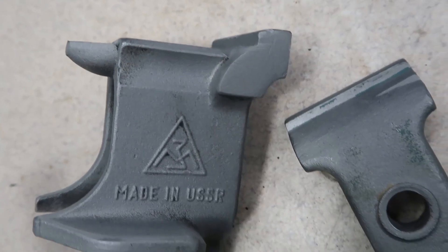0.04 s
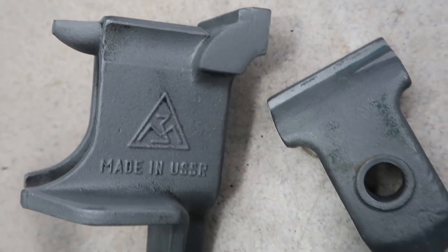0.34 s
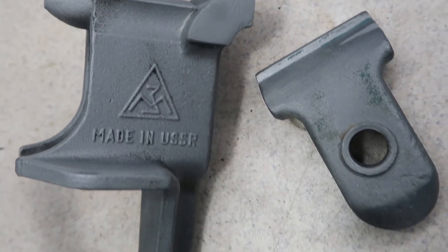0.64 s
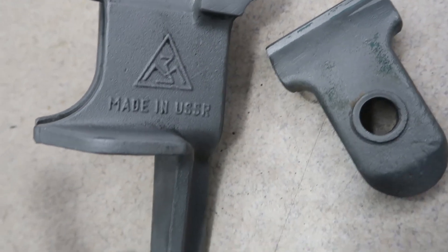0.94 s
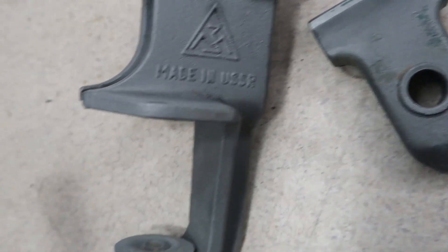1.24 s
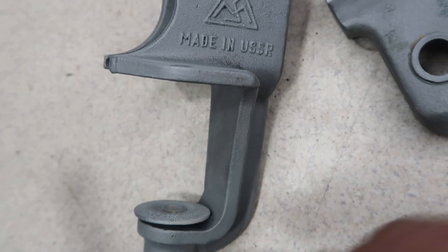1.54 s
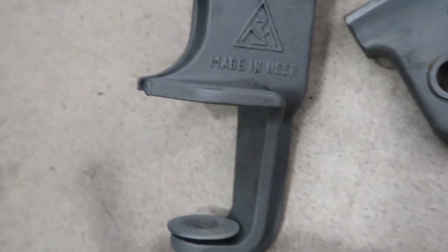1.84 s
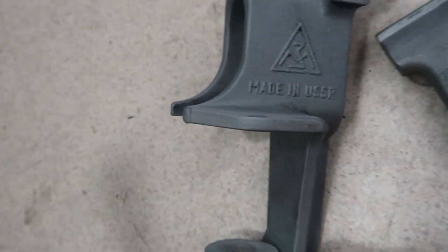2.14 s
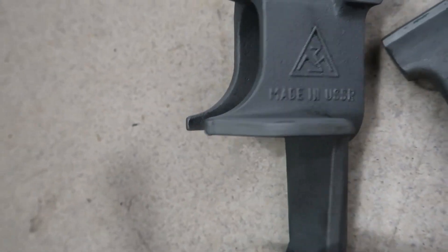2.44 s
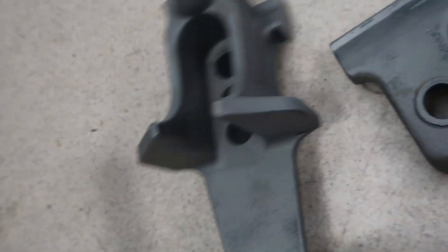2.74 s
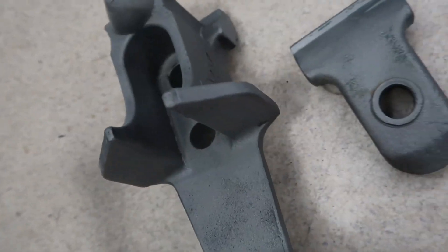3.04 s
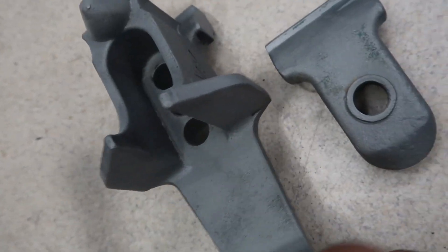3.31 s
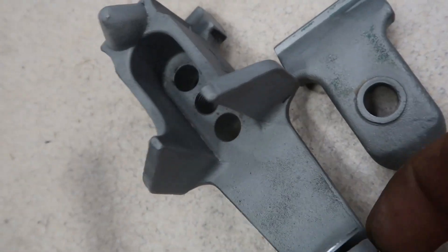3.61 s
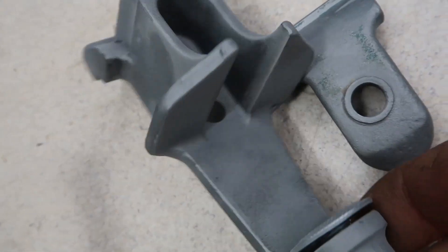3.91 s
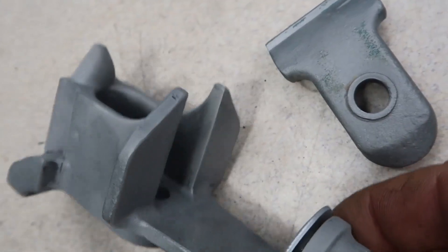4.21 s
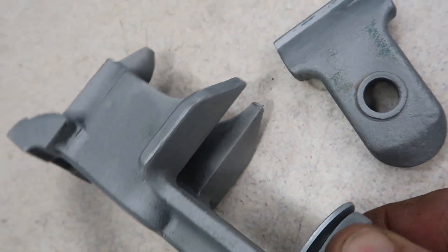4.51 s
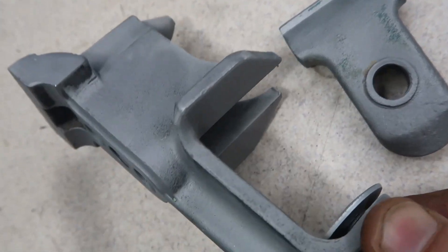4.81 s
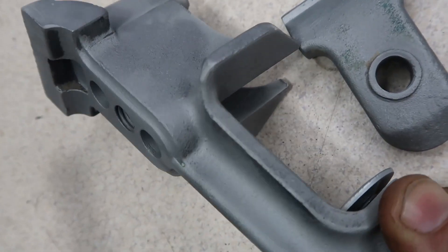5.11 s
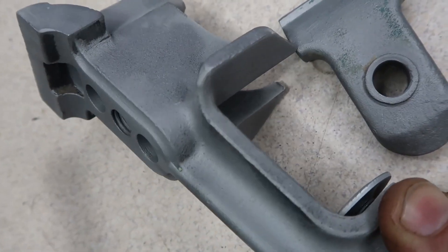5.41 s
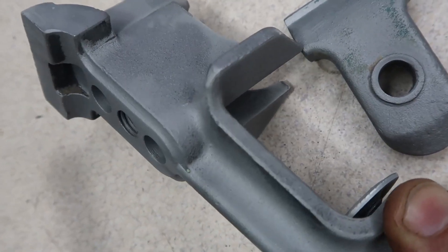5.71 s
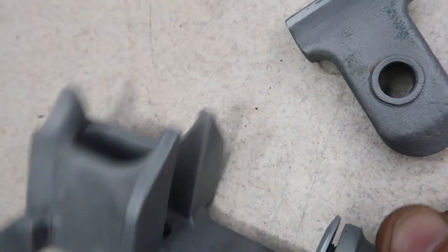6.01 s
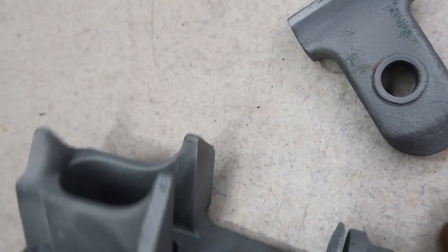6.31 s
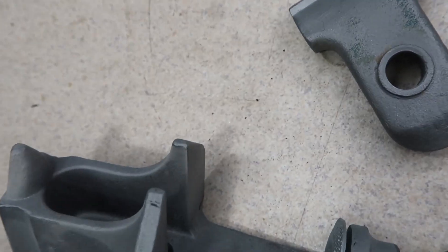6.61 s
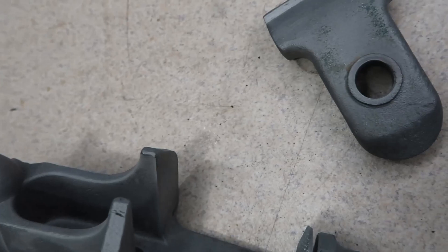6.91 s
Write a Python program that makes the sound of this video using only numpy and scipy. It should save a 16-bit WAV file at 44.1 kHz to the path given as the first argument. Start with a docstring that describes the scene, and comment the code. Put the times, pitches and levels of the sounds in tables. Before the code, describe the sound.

Faint room air and a low machine drone fill a bare workshop, with a barely audible finger rub just after 1 second. From 2 seconds, small ticks and brief rasps come from a cast-iron vise body being handled close to the microphone. At about 2.7 seconds it drags across the hard bench in a short, juddering scrape with a knock. It rocks softly with dull bumps, rubbing and clicks of grit until a second, grinding drag runs from 4 seconds and ends in a sharp knock at 4.4. Another knock comes at 5.2 seconds. After a few light ticks, the iron is set down at about 6.1 seconds with a quick cluster of loud knocks and a short metallic ring, then one last knock at 6.5. The hardest hits slightly overload the microphone and die away quickly in the room.

```python
"""Faint finger rubs on paint, then judders and knocks: a cast-iron vise body turned over on a bench.
The casting rocks under the hand, is dragged twice in stick-slip, tips and is set down with a few knocks.
Contact forces ring the modes of the hard bench top, the iron and a bare workshop; grit and nails tick.
Room air and a low machine drone lie beneath. The hardest knocks overload the close microphone:
their crests flatten, the gain ducks and slowly recovers."""
import sys
import numpy as np
from scipy import signal
from scipy.fft import rfft, irfft, next_fast_len
from scipy.io import wavfile
from scipy.ndimage import uniform_filter1d, minimum_filter1d, map_coordinates

SR = 44100
rng = np.random.default_rng(int(sys.argv[2]) if len(sys.argv) > 2 else 0)


def unload_wav(signal):
    """Save mono or channel-first audio to the path in sys.argv[1] as 16-bit WAV at rate SR, clipped to [-1, 1]."""
    wavfile.write(
        sys.argv[1],
        SR,
        np.round(np.clip(np.atleast_2d(signal).T, -1, 1) * 32767).astype(np.int16),
    )


N = 306481
TIME = np.arange(N) / SR


def from_db(db):
    """Decibels to gain."""
    return 10 ** (np.asarray(db) / 20)


def unit_rms(x):
    """Scale to rms 1."""
    return x / np.sqrt(np.mean(x ** 2) + 1e-20)


def at_hz(points, hz):
    """Interpolate (Hz, value) rows over log frequency."""
    points = np.array(points)
    return np.interp(np.log(hz + 1e-9), np.log(points[:, 0]), points[:, 1])


def cut(x, hz, kind, order=2):
    """Butterworth filter."""
    sos = signal.butter(order, np.clip(hz, 10, SR * 9 / 20), kind, fs=SR, output="sos")
    return signal.sosfilt(sos, x + 1e-18)


def drift(rate_hz):
    """Low-passed noise, rms 1."""
    return unit_rms(cut(rng.standard_normal(N), rate_hz, "low"))


def stereo_noise(correlation, size=N):
    """Two correlated white noises."""
    mid, side = rng.standard_normal((2, size))
    alike = np.clip(correlation, 0, 1)
    return np.sqrt((1 + alike) / 2) * mid + np.sqrt((1 - alike) / 2) * side * [[1], [-1]]


def colour(x, spectrum):
    """Shape noise by (Hz, dB) rows; rms 1."""
    size = next_fast_len(N)
    gain = from_db(at_hz(spectrum, np.fft.rfftfreq(size, 1 / SR)))
    return unit_rms(irfft(rfft(x, size) * gain, size)[..., :N])


def grains(per_s, spread_db):
    """Random clicks of uneven size, rms 1."""
    sizes = from_db(spread_db * np.minimum(rng.exponential(1, N), 4)) * rng.choice([-1, 1], N)
    return unit_rms(sizes * (rng.random(N) < per_s / SR))


def ringing(modes):
    """Impulse response of damped modes, 1 s."""
    t = TIME[:SR]
    return sum(from_db(db - 60 * t / t60_s) * np.sin(2 * np.pi * hz * t) for hz, db, t60_s in modes)


def through(x, response):
    """Convolve with an impulse response."""
    return signal.fftconvolve(np.atleast_2d(x), np.atleast_2d(response), axes=1)[:, :N]


def swell(start_s, end_s, rise_db_per_s, fall_db_per_s):
    """Gain that reaches 1 at the start, holds, and fades after the end."""
    under_db = rise_db_per_s * np.maximum(start_s - TIME, 0) + fall_db_per_s * np.maximum(TIME - end_s, 0)
    return from_db(-np.minimum(under_db, 200))


def bell(centre_s, width_s):
    """Gaussian envelope."""
    return np.exp(-np.minimum(((TIME - centre_s) / width_s) ** 2, 50))


def background(air_db, hiss_db):
    """Room air, correlated only in the bass; microphone hiss, machine drone, thin electronic whine."""
    # Each row: frequency in Hz, relative density in dB.
    air_spectrum = [(15, -37), (25, -9.5), (59, -4), (82, -11.5), (101, -9.5), (209, -18.5), (227, -16),
                    (281, -16), (433, -17), (537, -22.5), (648, -21.5), (1530, -25.5), (11800, -45.5),
                    (12800, -49), (15500, -76.5)]
    # Each row: frequency in Hz, width in Hz, rms level in dB.
    drone = [(53.8, 7, -63.5)]
    whine = [(13006, 10, -91)]
    diffuse = cut(stereo_noise(0), 220, "high") + cut(rng.standard_normal(N), 260, "low")
    air = from_db(air_db) * colour(diffuse, air_spectrum)
    hiss = from_db(hiss_db) * cut(stereo_noise(0), 2500, "high", order=1)
    tones = 0
    for hz, width_hz, db in drone + whine:
        cycles = np.cumsum(hz + width_hz / 2 * drift(width_hz)) / SR
        tones += from_db(db) * np.sqrt(2) * np.sin(2 * np.pi * cycles)
    return air + cut(hiss, 3500, "low") + tones


def hand():
    """The hand slides and pushes: envelopes of skin hiss, singing and shuffle."""
    # Each row: start in s, end in s, then relative levels in dB of hiss, singing and shuffle.
    strokes = [(1.113, 1.303, -75, -97, -76), (2.242, 2.277, -60, -75, -62),
               (2.467, 2.474, -49.5, -56, -40), (2.558, 2.586, -57, -80, -69),
               (2.751, 2.888, -57, -54.5, -57), (2.96, 3.217, -71.5, -68.5, -54.5),
               (3.267, 3.603, -63, -62, -51.5), (3.678, 3.805, -61.5, -68, -56.5),
               (3.854, 3.926, -60, -83, -48.5), (4.005, 4.324, -61, -62.5, -57.5),
               (5.813, 6.024, -63, -90, -66.5), (6.12, 6.125, -50.5, -88, -38),
               (6.464, 6.473, -46.5, -78, -68), (6.551, 6.596, -57.5, -94, -74)]
    power = 0
    for start_s, end_s, *levels_db in strokes:
        envelope = swell(start_s, end_s, rise_db_per_s=166, fall_db_per_s=169.5)
        power += np.outer(from_db(levels_db), envelope) ** 2
    return np.sqrt(power)


def singing_iron(tipped_s, flicker_db, stray_share):
    """Friction stirs high modes; each flickers, and the pitch strays as the contact point moves."""
    # Modes before and after tipping. Each row: frequency in Hz, relative level in dB, t60 in s.
    upright = [(3796, 0.5, 0.049), (5740, -15, 0.0055), (7850, -3, 0.018), (8670, 10, 0.0047),
               (9050, -4, 0.014), (11000, 6.5, 0.0037)]
    lying = [(3440, 4, 0.015), (8800, -1.5, 0.009), (10500, -9.5, 0.08)]
    singing = 0
    for modes, in_pose in (upright, TIME < tipped_s), (lying, TIME >= tipped_s):
        stirred = 0
        for mode in modes:
            ring = through(stereo_noise(0.52), ringing([mode])[:SR // 4])
            stirred += ring * from_db(flicker_db * drift(12))
        singing += unit_rms(stirred) * in_pose
    stray = stray_share * drift(11)
    position = np.arange(N) + np.cumsum(stray - stray.mean())
    return np.array([map_coordinates(channel, [position], order=3, mode="mirror") for channel in singing])


def rubbing(slide, sing, skin_db, ring_db, rasp_db, flutter_db):
    """Skin hisses over paint, the iron sings with it, and an edge rasps on the first tilt."""
    # Each row: frequency in Hz, relative density in dB.
    skin_spectrum = [(800, -1.5), (1800, 6.5), (3000, 5.5), (3800, 5.5), (4600, 3), (6500, -1),
                     (8700, -3.5), (11000, -4), (13000, -10), (15500, -32.5)]
    edge_spectrum = [(900, -6.5), (1600, 7.5), (2500, -2.5), (3000, 8), (3300, -18), (3700, 4), (4700, -6),
                     (6000, -39), (10000, -8), (15000, -53)]
    # Each row: time in s, relative level in dB.
    rasps = [(2.257, -56), (2.43, -51.5), (2.48, -45.5)]
    skin = slide * colour(stereo_noise(0.9) + 0.47 * grains(5500, 2.3), skin_spectrum)
    singing = sing * singing_iron(tipped_s=3.9, flicker_db=4.0, stray_share=0.0051)
    tilt = sum(from_db(db) * swell(s, s, rise_db_per_s=502, fall_db_per_s=450) for s, db in rasps)
    rasp = tilt * colour(stereo_noise(0.93) + grains(2600, 4.5), edge_spectrum)
    flutter = from_db(flutter_db * drift(42))
    return (from_db(skin_db) * skin + from_db(rasp_db) * rasp) * flutter + from_db(ring_db) * singing


def shuffle(push, gain_db):
    """Dull force of the casting rocking lightly under the hand."""
    return from_db(gain_db) * push * cut(cut(grains(450, 3.6), 380, "low"), 120, "high")


def skids(edge_ratio):
    """A fingertip or an edge skids: a short chirr of narrow-band noise."""
    # Each row: centre time in s, half-width in s, level in dB, centre frequency in Hz.
    chirrs = [(1.145, 0.036, -77, 3670), (1.28, 0.037, -69, 1680), (2.015, 0.0078, -68, 1500),
              (2.268, 0.007, -53, 3160), (2.408, 0.021, -58, 3200), (2.48, 0.006, -41.5, 3650),
              (2.501, 0.007, -47, 3900), (2.795, 0.07, -49, 2200), (2.83, 0.06, -66, 13000),
              (3.272, 0.0072, -60, 7900), (3.336, 0.01, -54, 9100), (3.425, 0.015, -63, 9400),
              (3.433, 0.02, -62, 3800), (3.537, 0.029, -71, 3870), (3.568, 0.014, -61, 5200),
              (3.615, 0.0046, -52, 1880), (3.745, 0.003, -41, 3000), (3.783, 0.0026, -50, 4260),
              (4.23, 0.052, -55, 3340), (4.252, 0.035, -61.5, 4550), (5.934, 0.008, -63, 1690)]
    out, noise = np.zeros((2, N)), stereo_noise(0.87)
    for s, width_s, db, hz in chirrs:
        span = slice(max(round((s - .15) * SR), 0), round((s + .15) * SR))
        band = unit_rms(cut(noise[:, span], [hz / edge_ratio, hz * edge_ratio], "band"))
        out[:, span] += from_db(db) * band * bell(s, width_s)[span]
    return out


def knocks(knock_low_hz, bump_edge_ratio, bump_clank_db):
    """Forces on bench and iron: broad pulses as the casting drops, narrow-band bumps as it rocks."""
    # Each row: time in s, force in dB, centre frequency in Hz.
    bumps = [(2.017, -36, 238), (2.272, -34.5, 135), (2.422, -28.5, 230), (2.639, -42, 380),
             (2.666, -20.5, 304), (2.722, -11, 234), (3.267, -32, 420), (3.390, -33.5, 367),
             (3.434, -41.5, 400), (3.560, -36.5, 316), (3.61, -41.5, 305), (3.683, -35, 290),
             (3.849, -30, 316), (3.896, -28.5, 487), (3.938, -29.5, 340), (3.968, -26, 330),
             (3.987, -18.5, 260), (4.054, -19.5, 447)]
    # Each row: time in s, force in dB, contact cutoff in Hz, share sent to the iron in dB.
    drops = [(2.8496, -13, 2280, -14.5), (3.999, -25, 2090, -2), (4.4375, -6.5, 2330, -12.5),
             (5.197, -16, 2700, -19.5), (5.2051, -18.5, 175, -29), (5.2107, -13, 185, -35),
             (6.0742, 1, 2610, -23.5), (6.0946, -4, 2100, -0.5), (6.1152, -4.5, 1020, -22),
             (6.1198, -12, 1510, -10.5), (6.4700, -2.5, 1310, -18.5)]
    click = signal.unit_impulse(SR // 20)
    soft = [(s, db, cut(click, [hz / bump_edge_ratio, hz * bump_edge_ratio], "band"), bump_clank_db)
            for s, db, hz in bumps]
    hard = [(s, db, cut(cut(click, hz, "low"), knock_low_hz, "high"), clank_db)
            for s, db, hz, clank_db in drops]
    bench, iron = np.zeros((2, N))
    for s, force_db, pulse, clank_db in hard + soft:
        at = round(s * SR)
        bench[at:at + len(pulse)] += pulse * from_db(force_db)
        iron[at:at + len(pulse)] += pulse * from_db(force_db + clank_db)
    return bench, iron


def ticks(crack_t60_s, splash_db, splash_t60_s, gain_db):
    """Grit and fingernails snap on the iron, each with a short splash of reflections."""
    # Each row: time in s, relative peak in dB, centre frequency in Hz.
    snaps = [(2.019, -36.5, 4400), (2.245, -38, 4300), (2.2662, -41, 4200), (2.4808, -29, 3800),
             (2.4965, -26, 4000), (2.783, -25, 5730), (3.6123, -34, 2870), (3.7424, -28.5, 4300),
             (3.7784, -27.5, 5160), (3.912, -36, 4800), (3.9663, -35, 4100), (4.245, -46, 4450),
             (4.308, -37.5, 5000), (4.4384, -32, 6430), (4.6556, -40.5, 3970), (5.001, -41.5, 5070),
             (5.0385, -40.5, 4710), (5.2039, -23, 6440), (5.225, -27.5, 5300), (5.942, -30, 5400),
             (5.9924, -30, 6000), (6.017, -37.5, 5840), (6.031, -35, 6620), (6.0565, -31, 4080),
             (6.276, -31, 5470), (6.4697, -20, 4320)]
    out, t = np.zeros((2, N)), TIME[:SR // 5]
    for s, peak_db, hz in snaps:
        crack = stereo_noise(1.0, size=len(t)) * from_db(-60 * t / crack_t60_s)
        splash = stereo_noise(.1, size=len(t)) * from_db(splash_db - 60 * t / splash_t60_s)
        tick = cut(cut(crack + splash, hz * .5, "high", order=3), hz * 2, "low")
        at = round(s * SR)
        out[:, at:at + len(t)] += from_db(peak_db + gain_db) * tick / np.abs(tick).max()
    return out


def glances(twin_ratio, twin_db):
    """A corner glances off the bench; the casting is lopsided, so each mode beats with a weaker twin."""
    # Each row: time in s, frequency in Hz, level in dB, t60 in s.
    pings = [(2.474, 4100, -44, 0.08), (2.474, 2980, -41.5, 0.12), (3.687, 3730, -59, 0.13),
             (3.999, 10540, -58.5, 0.38), (4.438, 1455, -24, 0.08), (6.0746, 1405, -20, 0.035),
             (6.0746, 2500, -26.5, 0.021), (6.0741, 3270, -28, 0.025), (5.197, 2474, -30.5, 0.035),
             (5.1981, 2760, -40, 0.034), (5.1973, 4170, -49, 0.04), (6.098, 1455, -19.5, 0.13),
             (6.096, 4587, -41.5, 0.19), (6.1155, 1640, -31, 0.1), (6.1155, 3640, -41.5, 0.06),
             (6.4713, 1120, -25.5, 0.06), (6.4702, 1930, -29.5, 0.045), (6.4731, 2476, -31, 0.035),
             (6.4717, 3000, -45.5, 0.05)]
    out = np.zeros(N)
    for s, hz, db, t60_s in pings:
        ping = ringing([(hz, db, t60_s), (hz * twin_ratio, db + twin_db, t60_s)])[:SR // 3]
        at = round(s * SR)
        out[at:at + len(ping)] += ping
    return out


def drag_motion():
    """Judder gain, grind gain and slip rate: each drag breaks loose, sags, catches and eases off."""
    # Each row: start, ease-off and stop in s; judder, extra breakaway judder and grind in dB;
    # grit bite time in s; first and last slip rate in Hz.
    pulls = [(2.65, 2.829, 2.92, -19.5, -2.5, -33.5, 0.15, 235, 285),
             (3.974, 4.306, 4.43, -21, 9.5, -43.5, 0.014, 270, 135)]
    # Brief chatters. Each row: centre time in s, half-width in s, extra judder in dB, extra grind in dB.
    catches = [(2.725, 0.0073, 4.5, 4), (2.769, 0.008, 3.5, 4), (2.812, 0.005, 3.5, -0.5),
               (2.88, 0.0083, 0, 4), (4.013, 0.008, -0.5, 9.5), (4.048, 0.0045, 8, 3.5),
               (4.063, 0.0093, 3.5, 5.5), (4.114, 0.008, -5.5, 6), (4.173, 0.0044, 3, 10.5),
               (4.196, 0.003, 3, 7.5), (4.225, 0.0068, 5, 8), (4.282, 0.0073, 1.5, 6),
               (4.299, 0.008, 5.5, 2.5)]
    attack_s, breakaway_s, settle_s = 0.023, 0.05, 0.1
    sag_db_per_s, judder_ease_db_per_s, grind_ease_db_per_s = 2, 61.5, 190.5
    judder, grind, rate_hz = np.zeros(N), np.zeros(N), np.ones(N)
    for start_s, ease_s, stop_s, judder_db, jerk_db, grind_db, bite_s, first_hz, last_hz in pulls:
        span = slice(round(start_s * SR), round(stop_s * SR))
        age_s, easing_s = np.maximum(TIME[span] - start_s, 0), np.maximum(TIME[span] - ease_s, 0)
        sag_db = sag_db_per_s * age_s
        loose_db = jerk_db * np.exp(-(age_s / breakaway_s) ** 2)
        judder[span] = from_db(judder_db + loose_db - sag_db - judder_ease_db_per_s * easing_s)
        judder[span] *= 1 - np.exp(-age_s / attack_s)
        grind[span] = from_db(grind_db - sag_db - grind_ease_db_per_s * easing_s)
        grind[span] *= 1 - np.exp(-(age_s / bite_s) ** 2)
        rate_hz[span] = last_hz + (first_hz - last_hz) * np.exp(-age_s / settle_s)
    for s, width_s, extra_judder_db, extra_grind_db in catches:
        catch = bell(s, width_s)
        judder *= 1 + (from_db(extra_judder_db) - 1) * catch
        grind *= 1 + (from_db(extra_grind_db) - 1) * catch
    return judder, grind, rate_hz


def drags(jitter, uneven_db, judder_db, lurch_db, grind_db, burst_fall_db, crunch_db):
    """Stick-slip force: each slip is a snap, a slower lurch and a dying burst of crushed grit."""
    judder, grind, pace_hz = drag_motion()
    rate_hz = pace_hz * np.exp(jitter * drift(150))
    cycles = np.cumsum(rate_hz) / SR
    snaps = np.diff(np.floor(cycles), prepend=0) * np.sqrt(200 / rate_hz) * from_db(uneven_db * drift(130))
    lurch = from_db(lurch_db + uneven_db * drift(40)) * np.cos(2 * np.pi * cycles)
    slips = cut(cut(snaps, 500, "low", order=1), 250, "high") + lurch
    grit = grains(5000, 3.2) * unit_rms(from_db(-burst_fall_db * (cycles % 1)))
    coarse = from_db(-26.5) * cut(cut(grit, 220, "high"), 680, "low")
    fine = cut(cut(grit, 630, "high"), 2150, "low", order=3)
    crunch = from_db(crunch_db) * cut(grit, [2800, 4600], "band")
    return from_db(judder_db) * (slips + coarse) * judder + from_db(grind_db) * (fine + crunch) * grind


def dispersed(x, hz, width_hz):
    """Allpass: bending waves arrive spread in time."""
    radius = np.exp(-np.pi * width_hz / SR)
    poles = [1, -2 * radius * np.cos(2 * np.pi * hz / SR), radius * radius]
    return signal.lfilter(poles[::-1], poles, x)


def room_tail(build_s):
    """Diffuse room response: decaying half-octave noise bands, less correlated towards the treble."""
    # Each row: frequency in Hz, relative density in dB.
    echo_spectrum = [(60, -9), (120, 5.5), (250, 0.5), (420, 1), (560, -6), (750, -7), (1100, -7.5),
                     (1500, -16.5), (2200, -17.5), (3500, -30.5), (9000, -27.5)]
    # Each row: frequency in Hz, t60 in s.
    decay_times = [(90, 0.96), (240, 0.53), (630, 0.71), (1200, 0.6), (2200, 0.59), (4500, 0.97),
                   (12000, 0.36)]
    t, out = TIME[:SR], 0
    edges_hz = 60 * 2 ** (np.arange(17) / 2)
    for low_hz, high_hz in zip(edges_hz, edges_hz[1:]):
        hz = np.sqrt(low_hz * high_hz)
        band = cut(stereo_noise(1.22 / (1 + (hz / 3000) ** 2), size=SR), [low_hz, high_hz], "band")
        out += band * from_db(at_hz(echo_spectrum, hz) - 60 * t / at_hz(decay_times, hz))
    return out * (1 - np.exp(-(t / build_s) ** 2))


def microphones(x, lag_s, skew_rad, skew_hz):
    """The left port hears later, with extra phase lag below skew_hz."""
    size = next_fast_len(N + 1000)
    hz = np.fft.rfftfreq(size, 1 / SR)
    lag_rad = 2 * np.pi * hz * lag_s + skew_rad / (1 + (hz / skew_hz) ** 2)
    left = irfft(rfft(x[0], size) * np.exp(-1j * lag_rad), size)[:N]
    return np.array([left, x[1]])


def gain_control(x, threshold_db, release_db_per_s, attack_s):
    """Peaks over the threshold pull the gain down; it creeps back up."""
    over_db = np.maximum(20 * np.log10(np.abs(x).max(axis=0) + 1e-9) - threshold_db, 0)
    held_db = np.maximum.accumulate(over_db + release_db_per_s * TIME) - release_db_per_s * TIME
    pole = np.exp(-1 / (attack_s * SR))
    return x * from_db(-signal.lfilter([1 - pole], [1, -pole], held_db))


def limiter(x, ceiling, window_samples):
    """Flatten each crest with a fast, smoothed gain."""
    gain = np.minimum(ceiling / (np.abs(x).max(axis=0) + 1e-9), 1)
    half = window_samples // 2 + 1
    return x * uniform_filter1d(uniform_filter1d(minimum_filter1d(gain, window_samples), half), half)


def scene():
    """Contact forces ring bench, iron and room; friction, ticks and background add directly."""
    # Each row: frequency in Hz, relative level in dB, t60 in s.
    bench_modes = [(186, -26, 0.045), (331, -10, 0.046), (459.5, -2, 0.029), (560, -5, 0.015),
                   (715, -12.5, 0.06), (900, -55.5, 0.05), (1230, -27, 0.022), (1760, -19, 0.018),
                   (1918, -12, 0.015), (2320, -15.5, 0.023), (2710, -25.5, 0.022), (3490, -23.5, 0.026)]
    iron_modes = [(860, -18.5, 0.077), (1038, -10, 0.081), (1099.5, 1.5, 0.039), (1163, -12.5, 0.041),
                  (1296, -7.5, 0.025), (1320, -6.5, 0.028), (1444, -5, 0.054), (1687, -5, 0.027),
                  (2045, -16.5, 0.041), (2440, -14, 0.035), (3006, -22.5, 0.045)]
    room_modes = [(106, -38.5, 1), (123.4, -34, 0.98), (149.8, -37, 0.58), (187.1, -21.5, 0.44),
                  (221.3, -30, 0.5), (304, -35, 0.35), (389, -27, 0.47), (447, -28, 0.49), (710, -37, 0.7),
                  (742, -34.5, 0.72)]
    slide, sing, push = hand()
    blows, clanks = knocks(knock_low_hz=119, bump_edge_ratio=1.395, bump_clank_db=-5.5)
    dragging = drags(jitter=.22, uneven_db=2.0, judder_db=-6.0, lurch_db=-39.5,
                     grind_db=-7.0, burst_fall_db=13.5, crunch_db=-15.5)
    on_bench = blows + dragging + shuffle(push, gain_db=-18.5)
    on_iron = clanks + from_db(-20.5) * dragging
    on_bench, on_iron = dispersed(np.array([on_bench, on_iron]), hz=1190, width_hz=1500)
    on_bench = dispersed(on_bench, hz=497, width_hz=273)   # the heavy top takes a few cycles to swing
    iron = through(on_iron, ringing(iron_modes)) + glances(twin_ratio=1.017, twin_db=-4)
    direct = through(on_bench, ringing(bench_modes) + ringing(room_modes)) + iron
    clatter = cut(on_iron, [1100, 1900], "band")
    into_room = from_db(-7.5) * on_bench + from_db(-35.0) * iron + from_db(2.0) * clatter
    echo = through(into_room, room_tail(build_s=0.0034))
    friction = rubbing(slide, sing, skin_db=-1.0, ring_db=-3.5, rasp_db=-1.5, flutter_db=3.0)
    friction += skids(edge_ratio=1.127)
    cracks = ticks(crack_t60_s=0.015, splash_db=-10.5, splash_t60_s=0.037, gain_db=-7.5)
    mix = direct + echo + friction + cracks + background(air_db=-60.5, hiss_db=-63)
    return microphones(mix, lag_s=0.00003, skew_rad=0.13, skew_hz=800)


def record(dry):
    """Gain control, limiter, steep low-pass at 15.7 kHz."""
    ducked = gain_control(dry, threshold_db=-9.0, release_db_per_s=4.5, attack_s=0.014)
    limited = limiter(ducked, ceiling=.305, window_samples=29)
    return signal.sosfilt(signal.ellip(10, .1, 80, 15700, fs=SR, output="sos"), limited)


dry = scene()
out = record(dry)
unload_wav(out)
```